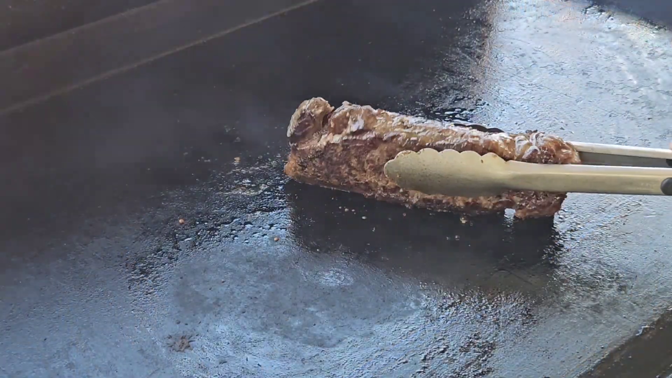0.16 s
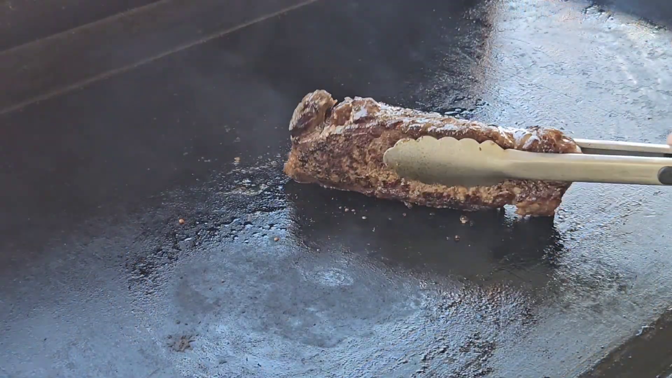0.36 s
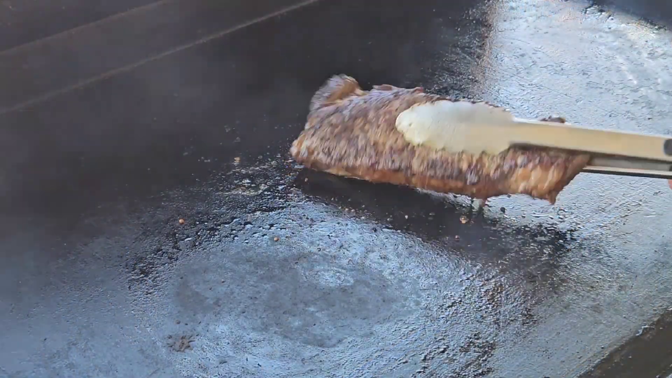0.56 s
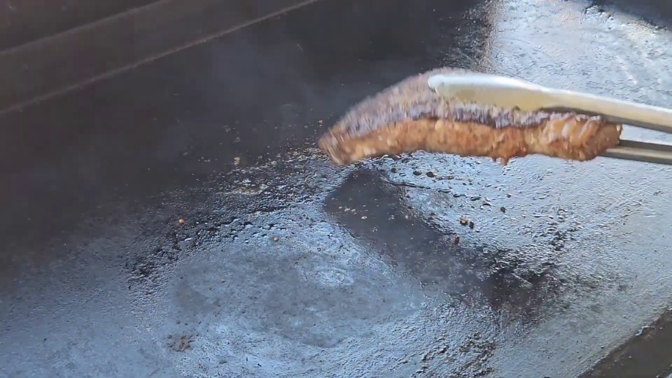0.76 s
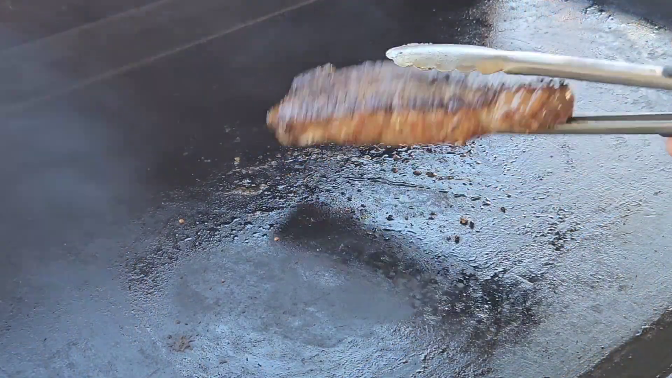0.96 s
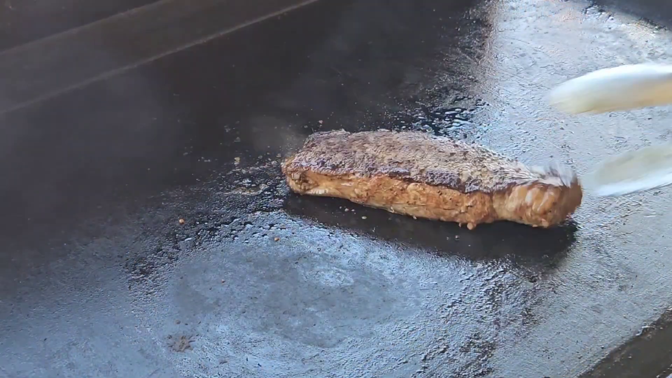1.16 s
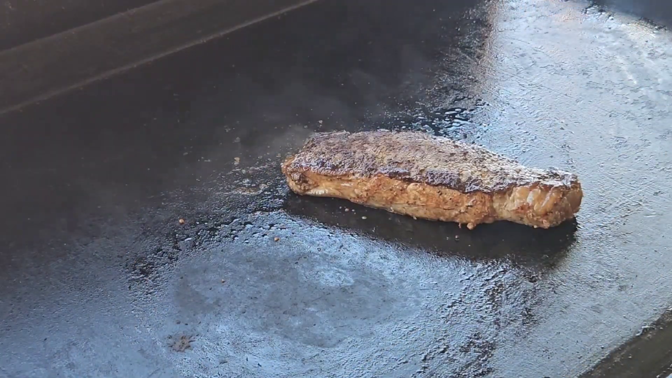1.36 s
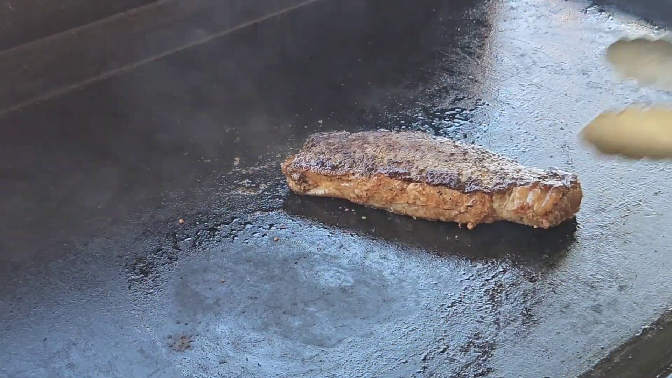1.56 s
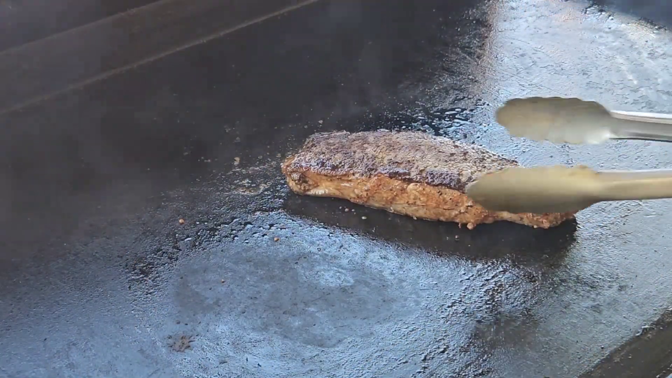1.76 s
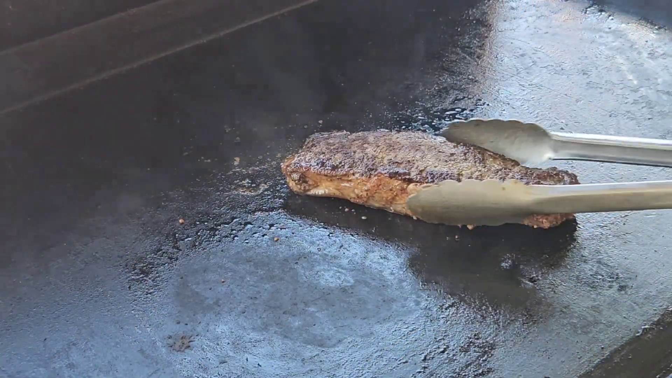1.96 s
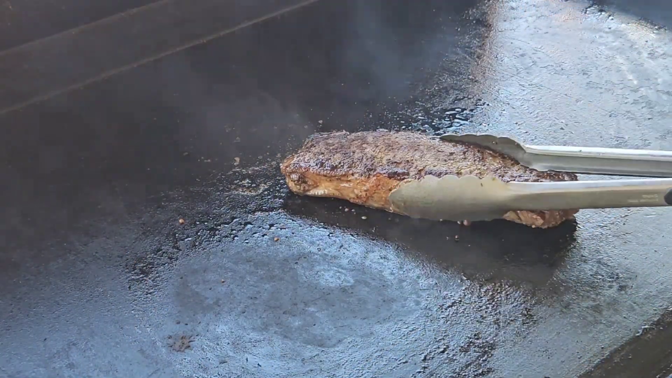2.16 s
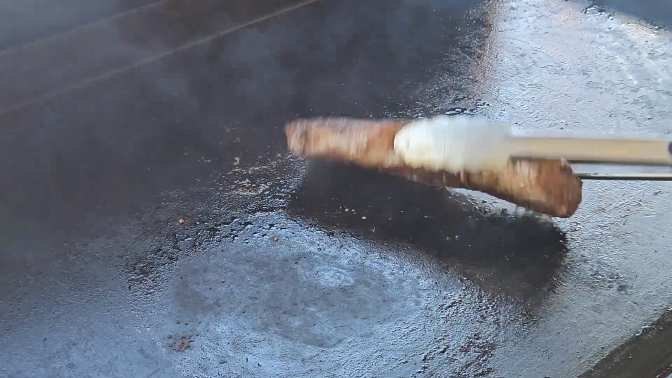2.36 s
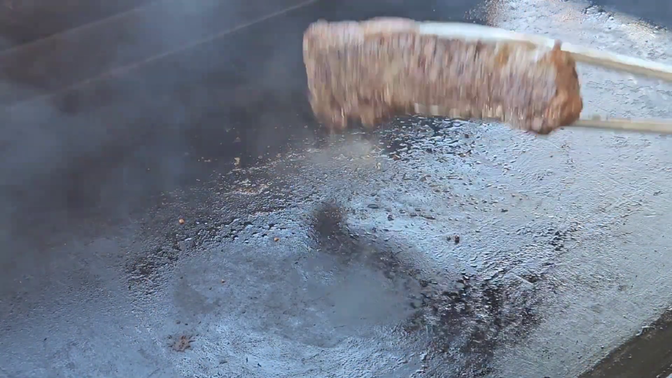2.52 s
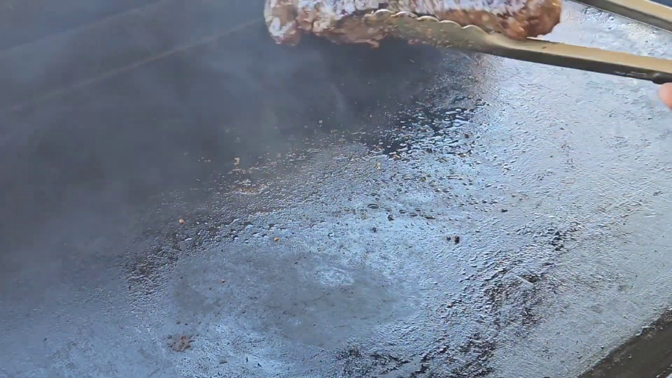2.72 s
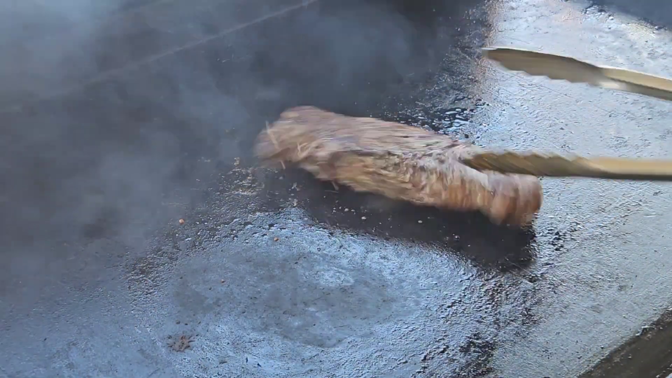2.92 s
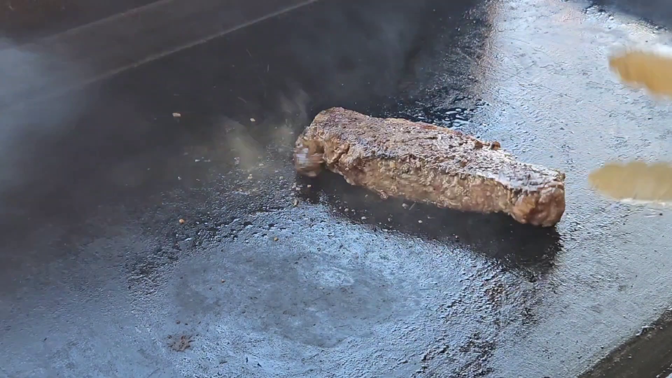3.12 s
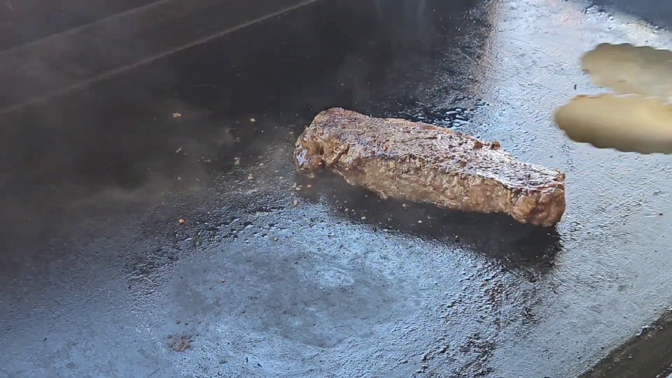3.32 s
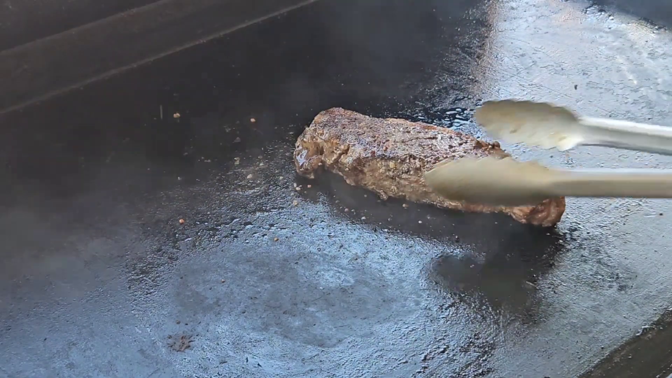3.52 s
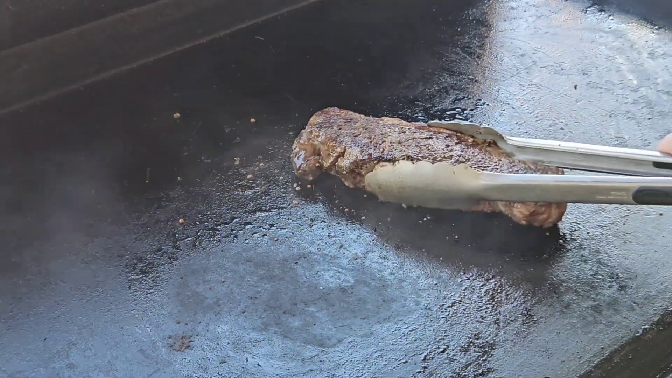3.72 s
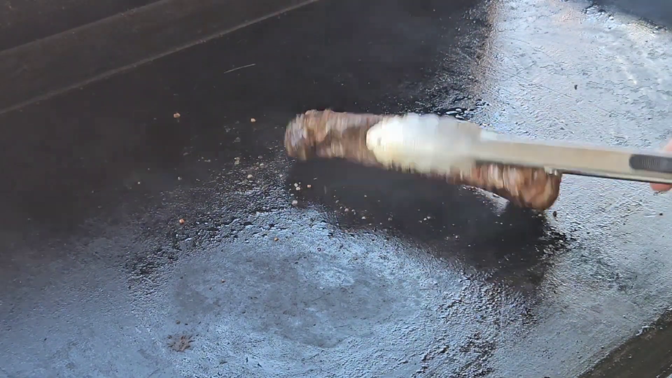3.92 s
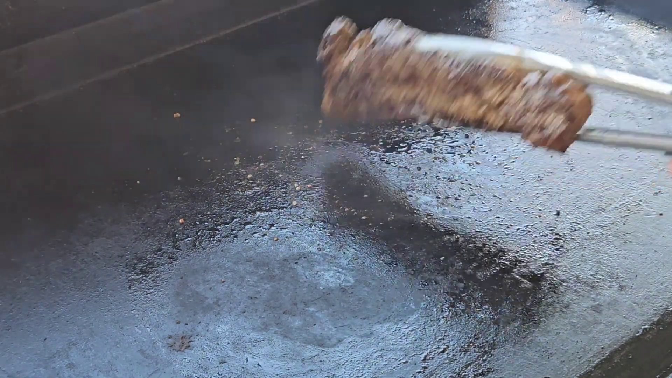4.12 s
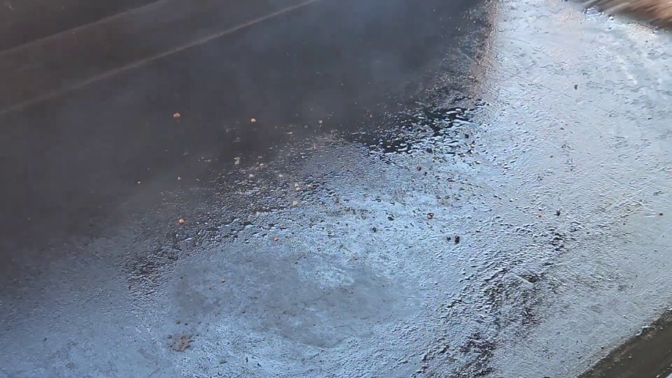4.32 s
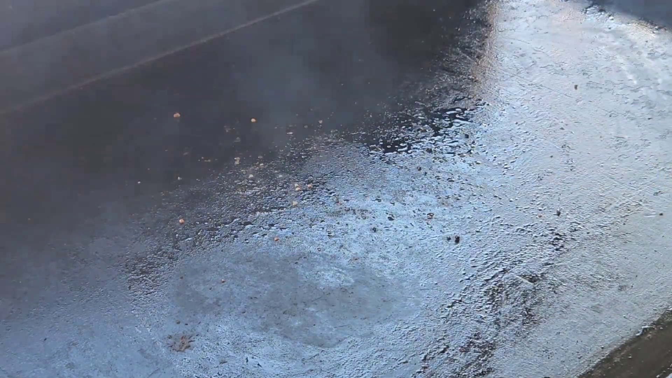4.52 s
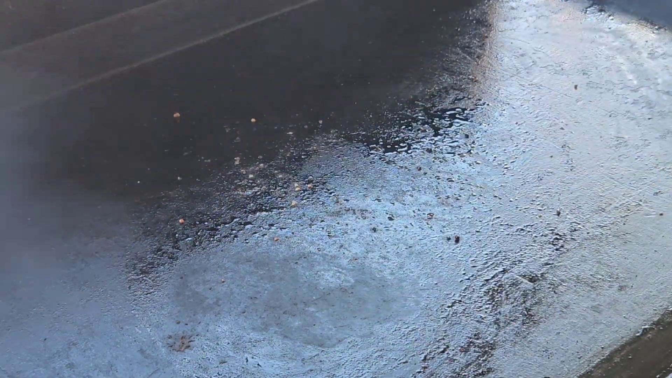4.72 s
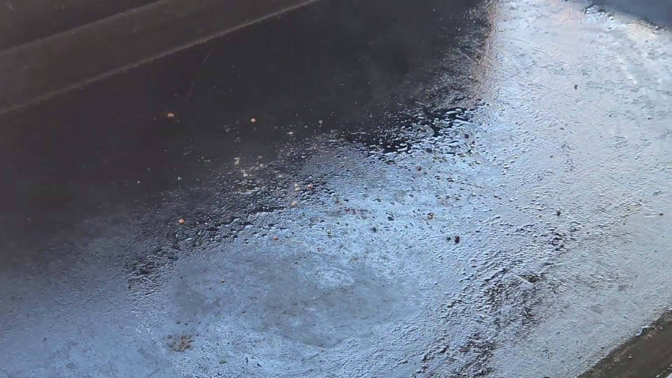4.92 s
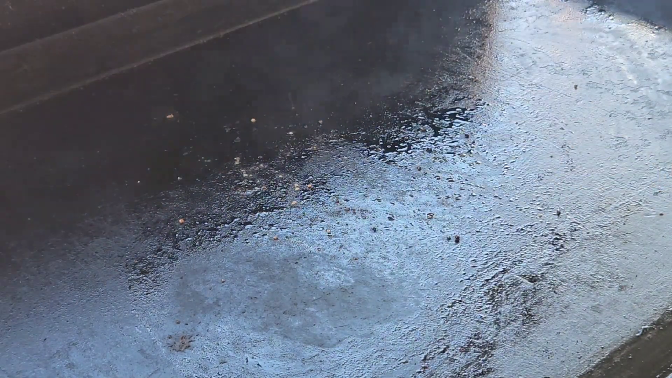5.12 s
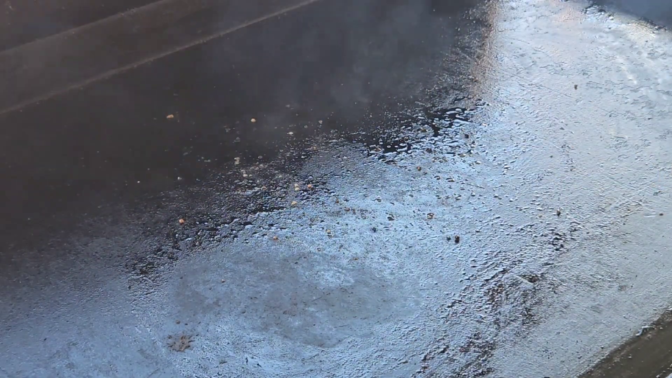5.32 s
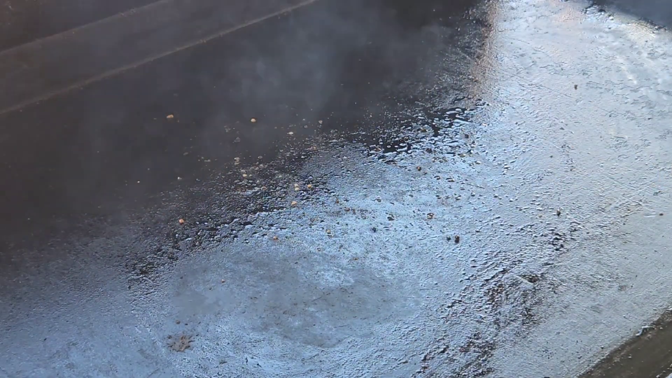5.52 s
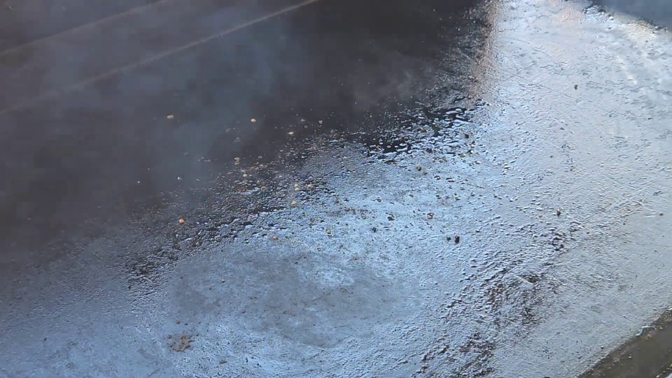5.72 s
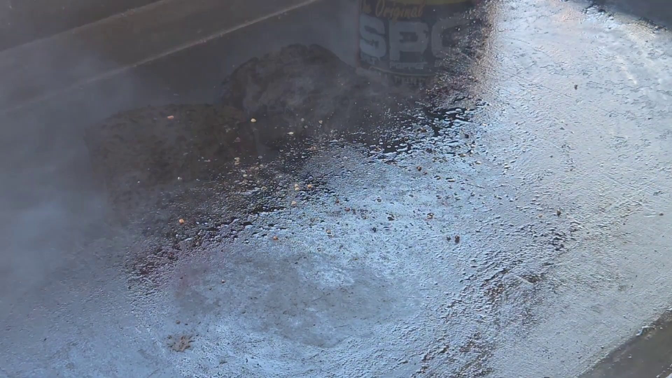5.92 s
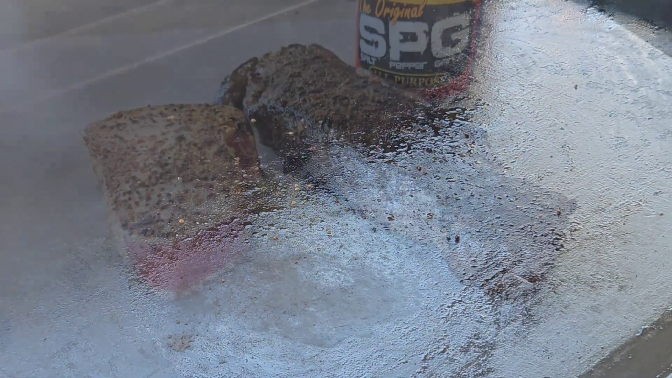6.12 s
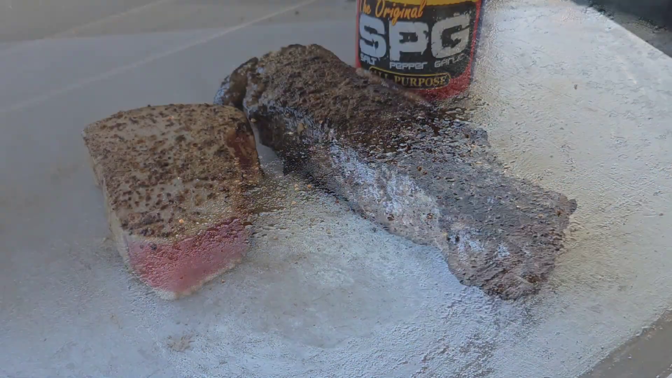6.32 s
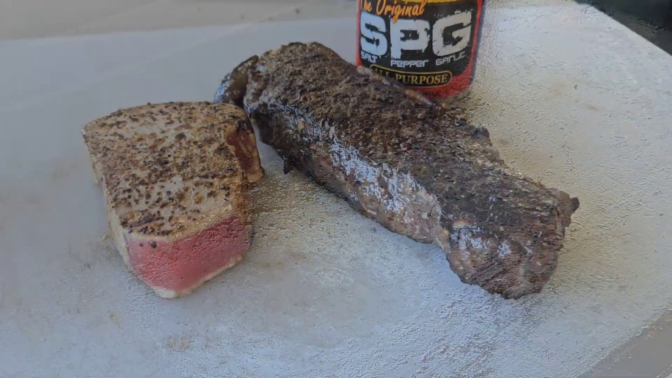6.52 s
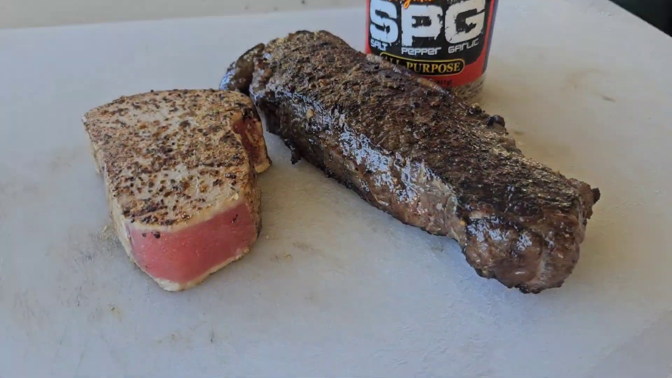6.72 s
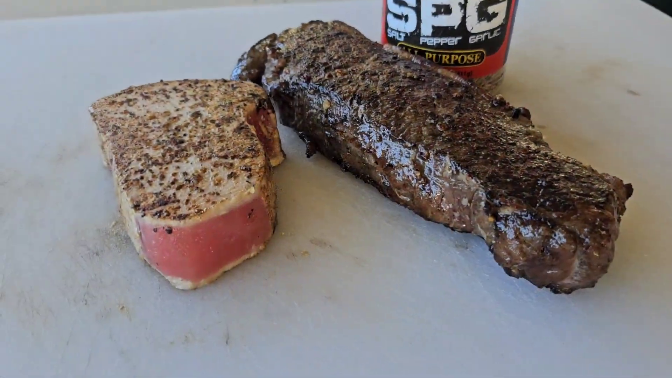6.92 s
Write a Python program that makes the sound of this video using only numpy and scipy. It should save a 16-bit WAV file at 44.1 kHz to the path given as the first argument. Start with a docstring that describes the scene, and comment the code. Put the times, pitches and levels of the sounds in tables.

```python
"""Outdoors at a hot flat-top griddle, a steak is turned with tongs over the low hum of a motor. The sizzle is a
cloud of bursting bubbles. It surges whenever wet meat meets the steel and dies down once the steak is off.
Drops of fat spit, steam rasps out from under the meat, and the tongs knock the plate and make it ring. Then the
scene changes: after a short silence there is only quiet air, a soft rustle and a little wind."""
import sys
import numpy as np
from scipy import signal
from scipy.fft import rfft, irfft, next_fast_len
from scipy.io import wavfile
from scipy.ndimage import uniform_filter1d

SR = 44100
rng = np.random.default_rng(int(sys.argv[2]) if len(sys.argv) > 2 else 0)


def pcm_store(signal):
    """Save signal as 16-bit PCM."""
    levels = np.round(np.clip(np.atleast_2d(signal), -1, 1) * 32767)
    wavfile.write(sys.argv[1], SR, levels.astype(np.int16).T)


N = 311598
TIME = np.arange(N) / SR
ON_EDGE_S, LIFTED_S = 1.06, 4.45  # the steak stops standing on its fatty edge; it is lifted off
STOP_S, QUIET_S = 6.409, 6.487  # the griddle scene ends; the quiet air begins

# tone colour of bursting bubbles and drops: (frequency [Hz], level [dB])
SIZZLE_COLOUR = [(300, -38), (800, -21.5), (1500, -17), (2300, -13), (3100, -9), (3800, -9.5), (4700, -5),
                 (6700, -7), (7400, -5), (8600, -5), (9900, -9.5), (11000, -5), (12500, 0.5), (13700, 0),
                 (14600, 2.5), (15600, -2)]


def gain_of(db):
    """Turns decibels into a factor to multiply a sound by."""
    return 10 ** (np.asarray(db) / 20)


def evened(x):
    """Scales a sound to an average (rms) level of 1; a pair is scaled by its first channel."""
    return x / np.sqrt(np.mean(np.atleast_2d(x)[0] ** 2) + 1e-20)


def curve(rows):
    """Joins rows of (time, values...) with straight lines: one curve for each value."""
    times, *columns = np.transpose(rows)
    return [np.interp(TIME, times, column) for column in columns]


def colour(x, points):
    """Makes each frequency louder or softer, following points of (frequency [Hz], level [dB])."""
    size = next_fast_len(x.shape[-1])
    hz, db = np.transpose(points)
    bin_db = np.interp(np.log(np.fft.rfftfreq(size, 1 / SR) + 1), np.log(hz), db)
    return irfft(rfft(x, size) * gain_of(bin_db), size)[..., :x.shape[-1]]


def drift(rate):
    """A smooth random wobble of average size 1, with up to `rate` swings a second."""
    t = TIME[::64]
    swings = sum(np.sin(2 * np.pi * (hz * t + rng.random())) for hz in np.geomspace(rate / 10, rate, 20))
    return np.interp(TIME, t, evened(swings))


def add(mix, start_s, sound):
    """Adds a two-channel sound to the mix at a given time."""
    part = mix[:, max(round(start_s * SR), 0):][:, :sound.shape[1]]
    part += sound[:, :part.shape[1]]


def spread(pair, side_db):
    """Turns mid (what both ears share) and side (how they differ) into left and right."""
    side = gain_of(side_db) * pair[1]
    return np.array([pair[0] + side, pair[0] - side])


def noise(points, size=N):
    """A mid and side pair of noise with the given tone colour."""
    return evened(colour(rng.standard_normal((2, size)), points))


def resonate(x, hz, width_hz):
    """Lets through a band of sound around the moving pitch `hz`."""
    turn = np.exp(2j * np.pi * np.cumsum(hz) / SR)
    feedback = np.exp(-np.pi * width_hz / SR)
    return 2 * (turn * signal.lfilter([1 - feedback], [1, -feedback], x / turn)).real


def outdoors(points, db):
    """Noise from all around: the bass is alike at both ears, the treble differs."""
    mid, side = noise(points)
    side = colour(side, [(40, -9), (120, -7.5), (300, -9.5), (700, -3.5), (3000, 2.0)])
    return gain_of(db) * spread([mid, side], 0)


def rumble(fade_db_per_s=0.26):
    """A low outdoor rumble around the griddle, slowly fading."""
    # tone colour of the rumble: (frequency [Hz], level [dB])
    rumble_colour = [(15, -16.5), (36, 6), (52, 2), (90, 3), (140, 2), (200, -1.5), (235, -7.5),
                     (265, -4.5), (320, -9), (520, -12.5), (700, -16), (1000, -17.5), (2000, -20.5),
                     (5000, -26.5)]
    return outdoors(rumble_colour, db=-38.5) * gain_of(-fade_db_per_s * TIME)


def wind(from_s=6.69, full_s=6.9, buffet_db=0.8):
    """A breeze builds up on the microphone and buffets it, more on the left."""
    # tone colour of the breeze: (frequency [Hz], level [dB])
    wind_colour = [(15, -14), (35, 5), (80, 2.5), (130, -8), (250, -13.5), (600, -68)]
    gust_db = np.interp(TIME, [from_s, full_s], [-59, -38.5]) + buffet_db * drift(25)
    return spread(noise(wind_colour), side_db=-12) * gain_of(gust_db) * gain_of([[2.5], [-3]])


def rustle(start_s=6.752, rise_s=.01, db=-58, fall_db_per_s=250):
    """One soft, bright rustle that dies away quickly."""
    since = np.maximum(TIME - start_s, 0)
    loudness = np.minimum(since / rise_s, 1) * gain_of(db - fall_db_per_s * since)
    return spread(noise([(1000, -12), (3200, 7), (8000, -8), (15000, -10)]), side_db=-3) * loudness


def quiet_air():
    """Still air with faint, fuzzy tones, a breeze and a rustle."""
    # tone colour of the still air: (frequency [Hz], level [dB])
    air_colour = [(20, -15), (90, 2), (160, -4.5), (280, -7), (420, -17.5), (700, -19.5), (1300, -23.5),
                  (2200, -23.5), (3000, -34), (4200, -34), (6000, -44), (8500, -42), (9500, -60),
                  (15000, -52)]
    # narrow bands of noise in that air: (pitch [Hz], level [dB])
    air_tones = [(335, -65.5), (1090, -72), (1300, -73), (2070, -71.5)]
    tones = sum(gain_of(db) * noise([(hz * 0.896, -60), (hz, 0), (hz * 1.085, -60)])[0]
                for hz, db in air_tones)
    return tones + wind() + rustle() + outdoors(air_colour, db=-50)


def motor(wobble=.002, waver_db=1.16, midway_s=2.24):
    """A motor gives one soft pulse a turn, heard as a wavering hum; an uneven whine rides above."""
    # how fast the motor runs: (time [s], speed [turns per second])
    motor_speed = [(0, 35.9), (1.1, 36.05), (3.1, 36.15), (4.1, 36.0), (4.5, 36.3), (5.3, 36.4),
                   (6.4, 36.6)]
    # the faint whine: (time [s], pitch [Hz], level [dB])
    whine_path = [(0, 410, -62), (1.8, 421.4, -60), (3.6, 409, -65.5), (4.15, 416, -62), (4.5, 423, -53.5),
                  (5.5, 424.2, -53), (6.4, 425, -58.5)]
    # tones of the hum: (swings per turn, first level [dB], midway level [dB], last level [dB])
    hum_tones = [(1, -45.5, -46, -45), (2, -35.5, -36, -35), (3, -46, -43.5, -40),
                 (4, -45.5, -49.5, -56), (5, -43, -42, -46.5), (6, -42, -43, -59)]
    speed, = curve(motor_speed)
    turns = np.cumsum(speed * (1 + wobble * drift(5))) / SR
    hum = np.zeros(N, complex)
    for multiple, *levels_db in hum_tones:
        db = np.interp(TIME, [0, midway_s, QUIET_S], levels_db) + waver_db * drift(4)
        hum -= gain_of(db) * np.exp(2j * np.pi * (multiple * turns + 0.069 * drift(3)))
    whine_hz, whine_db = curve(whine_path)
    whine_gain = gain_of(whine_db + drift(7.4))
    whine = whine_gain * np.sin(2 * np.pi * np.cumsum(whine_hz * (1 + wobble * drift(6))) / SR)
    # the hum reaches one ear slightly before the other
    return np.sqrt(2) * spread([hum.real + whine, hum.imag], side_db=-21)


def knocks(clack_db=-4, clatter_db=-16, clatter_s=0.078, detune=.004):
    """Tongs and meat knock the plate: it clacks, clatters and rings, a bit differently at each spot."""
    # knocks on the plate; meat lying on it lowers the ring: (time [s], level [dB],
    # rattle length [s], brightness [dB per octave], ring pitch [factor], ring level [dB])
    hits = [(1.134, -42, .008, -7, 0.72, -13), (1.147, -32, .005, 4.5, .91, -13),
            (1.166, -42, .005, -16, .91, -7), (2.123, -23.5, .005, 3.5, 0.98, -17),
            (2.129, -21.5, .006, 4.5, 0.99, -18), (2.142, -23.5, .006, 0.5, 1, -16.5),
            (2.176, -36, .003, 0, 0.98, -10), (2.214, -37.5, .004, 1.5, 1, -9.5),
            (2.957, -38, .002, 7.5, 0.99, -14), (3.0, -46.5, .03, -13.5, 0.88, -14)]
    # tones the plate rings with: (pitch [Hz], level [dB], time to fade by 60 dB [s])
    plate_tones = [(451.6, -8, 0.29), (679, 2.5, .34), (826, 1, .2), (1010, -5.5, .2), (1094, -1, .24),
                   (1346, -0.5, .24), (1530, 1.5, .12), (1572, 0.5, 0.25), (1744, -1.5, .1),
                   (1980, 1.5, .078), (2400, -0.5, .09), (3200, -4, .11)]
    # the dry clack of a knock: (frequency [Hz], level [dB])
    clack_colour = [(300, -31), (560, -16.5), (670, 3), (830, 4), (980, -6.5), (1120, -3), (1300, -7),
                    (1530, 2), (1760, -1), (1980, -4), (2150, -19.5), (3200, -17), (6000, -49.5)]
    # the dull wash of the plate and its frame: (frequency [Hz], level [dB])
    clatter_colour = [(200, -16), (330, -5.5), (450, -3), (540, -8.5), (660, 5.5), (830, -0.5), (1000, -2),
                      (1250, -3), (1580, -2.5), (2100, -12), (3200, -17.5), (6000, -40)]
    out, t = np.zeros((2, N)), np.arange(SR // 2) / SR
    for start_s, db, rattle_s, bright_db, pitch, ring_db in hits:
        clack = noise(clack_colour, len(t)) * gain_of(clack_db) * np.exp(-t / rattle_s)
        clatter = noise(clatter_colour, len(t)) * gain_of(clatter_db) * np.exp(-t / clatter_s)
        knock = clack + clatter
        for hz, tone_db, fade_s in plate_tones:
            ring_hz = hz * pitch * (1 + detune * rng.uniform(-1, 1))
            ring = np.sin(2 * np.pi * (ring_hz * t + rng.random((2, 1))))
            knock += gain_of(ring_db + tone_db - 60 * t / fade_s) * ring
        add(out, start_s, gain_of(db) * colour(knock, [(500, -bright_db), (4000, 2 * bright_db)]))
    return spread(out, side_db=-8)


def hood(x):
    """The steel hood and splash guards throw the sound back a few milliseconds late."""
    # echoes off the steel: (delay [s], level [dB])
    echoes = [(.0023, -25.5), (.0059, -15.5), (0.0099, -17)]
    thrown_back = sum(gain_of(db) * np.pad(x, ((0, 0), (round(delay_s * SR), 0)))[:, :N]
                      for delay_s, db in echoes)
    return (x + thrown_back) / np.sqrt(1 + sum(gain_of(db) ** 2 for _, db in echoes))


def rasps(pops_per_s=2200, scatter_db=4, side_db=-2):
    """Steam sputters out from under the meat; the gap rings broadly, and lower as it opens."""
    # steam escaping as the meat lands or peels off:
    # (start [s], length [s], first pitch [Hz], last pitch [Hz], level [dB])
    escapes = [(2.26, 0.19, 3500, 2920, -33.5), (3.0, .09, 3100, 2600, -32.5),
               (3.794, .09, 3900, 3700, -31.5), (3.881, .13, 4200, 3600, -28.5),
               (3.981, 0.13, 3100, 2400, -34.5)]
    out = np.zeros((2, N))
    for start_s, length_s, from_hz, to_hz, db in escapes:
        size = round(length_s * SR)
        progress = np.linspace(0, 1, size)
        pops = rng.standard_normal((2, size))
        pops *= gain_of(scatter_db * np.minimum(rng.exponential(1, size), 3))
        pops *= rng.random(size) < pops_per_s / SR
        hz = from_hz * (to_hz / from_hz) ** progress
        for _ in range(3):
            pops = resonate(pops, hz, width_hz=2400)
        swell = np.sqrt(4 * progress * (1 - progress))
        add(out, start_s, gain_of([[db], [db + side_db]]) * evened(pops) * swell)
    return out


def burst(decay_s, tone=0.83, splash_db=-25, splash_s=0.0085, swell_s=0.00017, hold_s=0, size=1024):
    """One bubble swells, snaps and splashes faintly; `tone` adds a random pitch of its own."""
    t = np.arange(size) / SR - 3 * swell_s  # the snap comes at t = 0
    after = np.maximum(t - hold_s, 0)
    swell = np.exp(np.minimum(t, 0) / swell_s)
    fade = np.exp(-after / decay_s) + gain_of(splash_db) * np.exp(-after / splash_s)
    snap = rng.standard_normal((2, size)) * swell * fade
    pitch_filter = signal.iirpeak(rng.uniform(1500, 15500), Q=3, fs=SR)
    snap = snap + tone * signal.lfilter(*pitch_filter, snap)
    return snap / np.linalg.norm(snap, axis=1, keepdims=True)


def spatter(boil_db, start_s, end_s, over_db, decay_s, count, scatter_db=3, bass_spread_db=5):
    """Lists small spits at random moments, a little louder than the boiling, as rows for spits()."""
    moment, size, length, bass = rng.random((count, 4)).T
    times = start_s + (end_s - start_s) * (np.arange(count) + moment) / count
    db = np.interp(times, TIME, boil_db) + over_db + scatter_db * (2 * size - 1)
    return list(zip(times, db, decay_s * 2 ** (length - .5), bass_spread_db * (2 * bass - 1)))


def spits(boil_db, level_db=-2.2, side_db=-0.5, small_drop_s=0.00041):
    """Single drops of fat explode; the larger the drop, the longer its pop."""
    # the loud spits: (time [s], relative peak level [dB], decay [s], bass boost [dB])
    loud_spits = [(.0161, -18.5, .002, 5), (.1018, -12.5, .0006, -1), (.1236, -12.5, .0006, -4),
                  (.1844, -17, .0005, -7), (.2046, -16.5, .0006, 6), (.2277, -13.5, .0006, -3),
                  (.2467, -17, .0006, -4), (.2817, -14.5, .0006, -2), (.3124, -18, .0005, -1),
                  (.3354, -16, .0005, -4), (.3661, -15.5, .0007, -4), (.3754, -17.5, .0005, -4),
                  (.4108, -18.5, .0006, -1), (.4233, -15.5, .0005, -5), (.483, -18.5, .0005, 2),
                  (.4961, -13, .0005, -2), (.5128, -17, .0005, -4), (.5158, -17, .0005, 4),
                  (.5588, -17, .0004, -5), (.5701, -14, .0005, -6), (.6672, -18.5, .0005, 2),
                  (.6757, -17, .0009, 5), (.7333, -18, .0005, 1), (.8422, -20.5, .0005, 4),
                  (.8445, -18.5, .0016, 2), (.8606, -17, .0015, 3), (.8763, -16, .0009, -1),
                  (.886, -16, .0012, -2), (.956, -14.5, .0012, 2), (.9784, -19, .0007, 1),
                  (.9902, -20, .0005, -3), (1.0443, -17.5, .0006, -1), (1.0537, -18.5, .0005, 2),
                  (1.3112, -8.5, .0004, -1), (1.3635, -11, .0003, 3), (1.5244, -10.5, .0004, -3),
                  (1.6423, -10, .0004, -4), (2.1582, -12, .0005, -4), (2.317, -12.5, .0007, 1),
                  (2.8204, -17, .0005, 0), (2.9247, -18, .0005, -3), (2.9791, -14.5, .0005, 1),
                  (3.2135, -9.5, .0003, 2), (3.249, -9.5, .0003, 2), (3.2615, -9, .0004, 0),
                  (3.6663, -6.5, .0004, 2), (3.8527, -14, .0004, 3), (3.9435, -12, .0004, 4),
                  (3.987, -12, .0004, 2), (4.0364, -10.5, .0007, 4), (4.058, -15, .0005, 7),
                  (4.1179, -12, .0005, -1), (4.126, -14, .0005, 0), (4.1812, -13.5, .002, 2),
                  (4.2585, -16.5, .0012, 4), (4.316, -16, .0008, 1), (4.394, -17, .002, 3),
                  (4.4051, -13, .0006, 1), (4.5797, -23, .0006, -2), (4.7042, -20.5, .0006, 4),
                  (4.9018, -16, .0005, -5), (5.4612, -21.5, .0008, 2), (5.5701, -24, .001, 0),
                  (5.7341, -23, .0004, -8), (5.8303, -26, .0006, 2), (5.9082, -26.5, .0006, -1),
                  (6.0181, -27, .0005, -2), (6.1181, -23, .0006, 5), (6.2103, -26.5, .0006, 3),
                  (6.3885, -24, .0006, 1), (6.3931, -24.5, .0015, 3)]
    # how a spit differs from the sizzle: (frequency [Hz], level [dB], bass boost [factor])
    spit_colour = [(700, -8, .6), (1800, -1, 1.1), (4000, 1, 1.0), (7500, 2.5, .4), (12000, 0, 0)]
    out = np.zeros((2, N))
    # the steak spatters most often while it stands on its fatty edge
    from_edge = spatter(boil_db, 0, ON_EDGE_S, over_db=5, decay_s=.00022, count=32)
    from_plate = spatter(boil_db, ON_EDGE_S, LIFTED_S, over_db=4.5, decay_s=.00012, count=34)
    from_film = spatter(boil_db, LIFTED_S, STOP_S, over_db=4, decay_s=.00022, count=30)
    for time_s, db, decay_s, bass_db in loud_spits + from_edge + from_plate + from_film:
        swell_s = .00012 * min(decay_s / small_drop_s, 2)
        pop = colour(burst(decay_s, tone=0, swell_s=swell_s, hold_s=.00025), SIZZLE_COLOUR)
        pop = colour(pop, [(hz, tilt_db + share * bass_db) for hz, tilt_db, share in spit_colour])
        loudest_millisecond = np.sqrt(uniform_filter1d(pop ** 2, size=44).max(axis=1, keepdims=True))
        pop *= gain_of(db + level_db) * gain_of([[0], [side_db]]) / loudest_millisecond
        add(out, time_s - 3 * swell_s - small_drop_s / 2, pop)
    return out


def boiling(film_db=-32.5, dry_from_s=4.78, dry_db_per_s=5):
    """How hard the plate boils: curves in dB for the level, the large and the medium bubbles."""
    # wet meat meets hot steel as the steak is rocked, dropped, pressed or dragged: (start [s],
    # rise [s], hold [s], level [dB], boiling off [dB per s], large bubbles [dB], medium bubbles [dB])
    surges = [(0, 0.0085, .5, -35.5, 56, -7, 4.5), (0.47, .02, .02, -32, 120.5, -7, 4),
              (0.547, 0.042, .03, -27, 61.5, 1.5, -0.5), (1.111, 0.036, 1.115, -22, 38.5, -2, 2),
              (1.205, 0.085, 0.064, -20, 20, -3, 3.5), (1.843, 0.044, .06, -25.5, 27, -5.5, 4.5),
              (2.19, 0.12, 0.076, -21, 68.5, 1.5, 5.5), (2.332, .11, .05, -16.5, 131, 0.5, -2.5),
              (2.575, 0.043, 0.071, -24, 18.5, 4, 0), (2.952, 0.053, .07, -18, 170, 6, 2.5),
              (3.021, 0.12, .15, -15, 57.5, -4.5, 1), (3.276, 0.055, .06, -23, 26, 6.5, -1.5),
              (3.562, 0.066, 0.044, -24.5, 65.5, -3, 4), (3.749, .16, 0.11, -18.5, 68, 2, 3),
              (4.094, 0.017, .01, -24.5, 119.5, 3, -7), (4.164, 0.009, 0.015, -24.5, 71, -2, 1),
              (4.236, 0.02, 0.02, -27.5, 73, 3, -2), (4.307, 0.008, 0.015, -31, 88, 3, 2),
              (4.38, 0.01, 0.018, -29, 110, 6, 1.5), (6.385, 0.004, 0.012, -36.5, 120, 9, 1)]
    # a film of fat simmers fitfully, and dries out once the steak is gone
    drying_db = dry_db_per_s * np.maximum(TIME - dry_from_s, 0)
    powers = [gain_of(film_db - drying_db + drift(14)) ** 2]
    bubble_mix_db = [(2.8, -0.9)]  # the film's large and medium bubbles
    for start_s, rise_s, hold_s, db, fall_db_per_s, large_db, medium_db in surges:
        rise = np.clip((TIME - start_s) / rise_s, 0, 1)
        fall_db = fall_db_per_s * np.maximum(TIME - start_s - rise_s - hold_s, 0)
        powers.append((rise * gain_of(db - fall_db)) ** 2)
        bubble_mix_db.append((large_db, medium_db))
    total = sum(powers)
    large, medium = gain_of(bubble_mix_db).T ** 2 @ np.array(powers) / total  # the loudest counts most
    return 10 * np.log10([total, large, medium])


def sizzle(boil_db, large_db, medium_db, pops_per_s=2200, crowding=.7, steam_db=-2, kinds=48):
    """Countless bubbles burst over a hiss of steam; harder boiling crowds them together."""
    vigour_db = boil_db - boil_db.mean()
    rate = pops_per_s * gain_of(crowding * vigour_db)
    scatter_db = np.where(TIME < ON_EDGE_S, 2, 2.5)  # how much the bubbles differ in size
    sizes = gain_of(scatter_db * np.minimum(rng.exponential(1, N), 4))
    sizes /= np.sqrt(uniform_filter1d(sizes ** 2, size=4096))
    sizes *= rng.random(N) < rate / SR  # keep only the moments when a bubble bursts
    kind = rng.integers(0, kinds, N)
    pops = np.zeros((2, N))
    for k in range(kinds):
        bubble = burst(decay_s=0.0005 * rng.uniform(0.64, 1.93))
        pops += signal.oaconvolve((sizes * (kind == k))[None], bubble, axes=1)[:, :N]
    steam = gain_of(steam_db) * rng.standard_normal((2, N))
    cloud = evened(colour(evened(pops / np.sqrt(rate)) + steam, SIZZLE_COLOUR))
    # freshly wetted steel makes large, low bubbles; flat meat medium ones; a drying film fine ones
    large = colour(cloud, [(1000, -9.5), (2800, -3), (3600, -1), (4400, -30)])
    medium = colour(cloud, [(3400, -31.5), (4000, 0), (4400, 0), (5400, -1.5), (6800, -6), (9000, -29.5)])
    fine = colour(cloud, [(9000, -33), (11500, -1.5)])
    for band, boost_db in (large, large_db), (medium, medium_db), (fine, -0.073 * vigour_db):
        cloud += (gain_of(boost_db) - 1) * band
    flutter_db = 0.92 * drift(60) + 0.5 * drift(16)
    return cloud * gain_of(boil_db + flutter_db)


def frying():
    """The steak sizzles, spits and rasps under the hood; the treble spreads wide."""
    # how wide the frying sounds: (frequency [Hz], side level [dB])
    width = [(400, -13), (1100, -7), (2600, -19.5), (3800, -3.5), (4800, -2), (6000, -2.5), (7500, 0.5),
             (10000, -0.5), (13000, 1.5), (15500, -1.5)]
    # which way it leans: (frequency [Hz], left minus right [dB])
    lean = [(3500, 0), (4700, -2), (6200, 3), (8200, -0.5), (9200, 2), (10500, 4), (11800, -6),
            (12500, -4.5), (13200, 4), (14700, -5.5)]
    boil_db, large_db, medium_db = boiling()
    mid, side = hood(sizzle(boil_db, large_db, medium_db) + spits(boil_db) + rasps())
    left, right = spread([mid, colour(side, width)], 0)
    return np.array([colour(left, [(hz, db / 2) for hz, db in lean]),
                     colour(right, [(hz, -db / 2) for hz, db in lean])])


def scene(griddle_db=1, stop_decay_s=.0016, quiet_rise_s=.00073):
    """The griddle, a short silence, then the quiet air."""
    griddle = frying() + knocks() + motor() + rumble()
    fade_out = np.exp(-np.maximum(TIME - STOP_S, 0) / stop_decay_s)
    fade_in = np.clip((TIME - QUIET_S) / quiet_rise_s, 0, 1)
    return gain_of(griddle_db) * griddle * fade_out + quiet_air() * fade_in


def record(dry):
    """Clips peaks at full scale, then removes the very highest treble."""
    low_pass = signal.firwin(401, cutoff=15750, window=("kaiser", 8), fs=SR)
    return signal.oaconvolve(np.clip(dry, -1, 1), low_pass[None], "same")


dry = scene()
out = record(dry)
pcm_store(out)
```